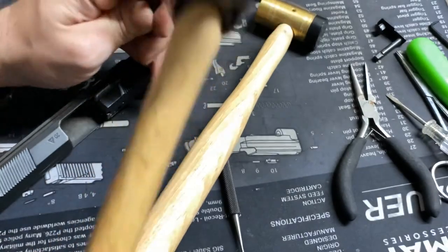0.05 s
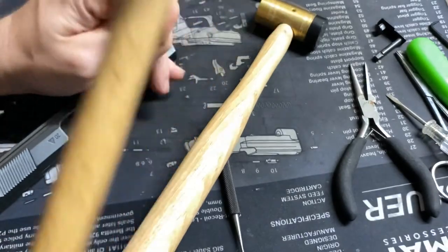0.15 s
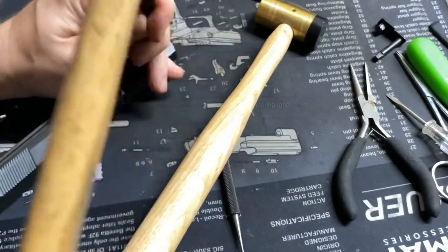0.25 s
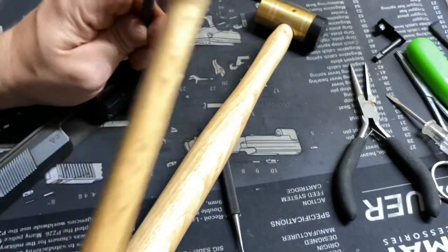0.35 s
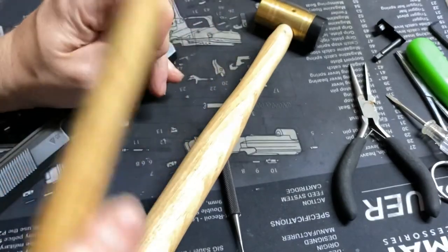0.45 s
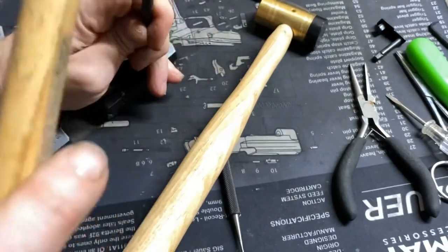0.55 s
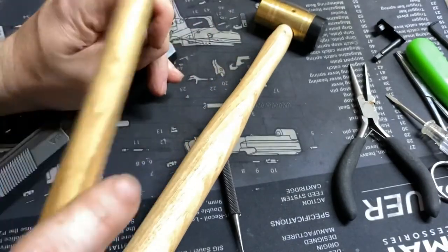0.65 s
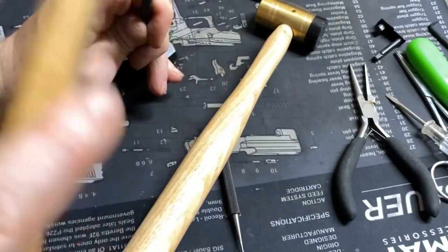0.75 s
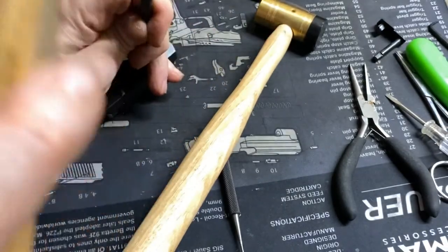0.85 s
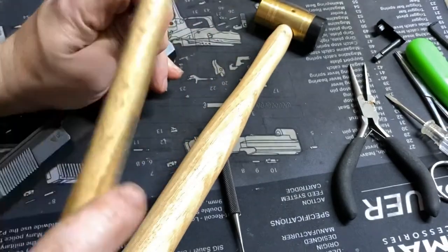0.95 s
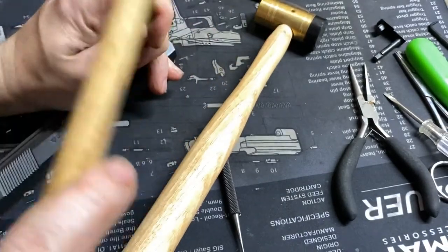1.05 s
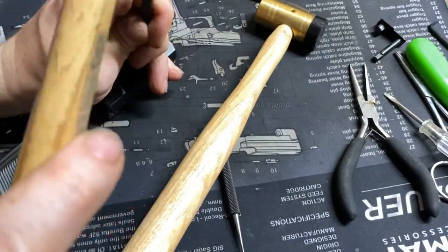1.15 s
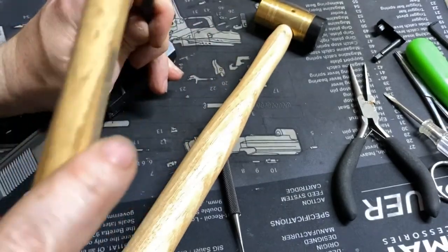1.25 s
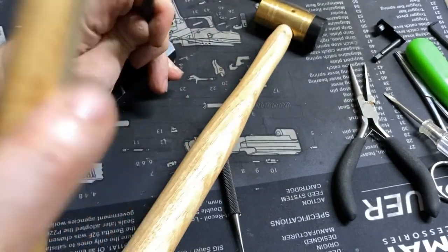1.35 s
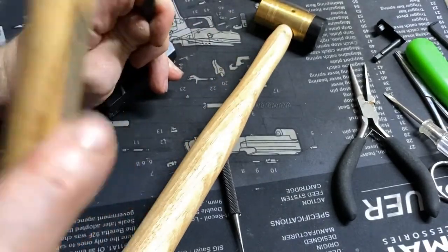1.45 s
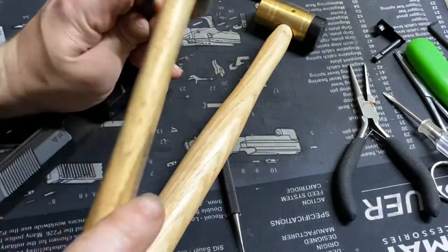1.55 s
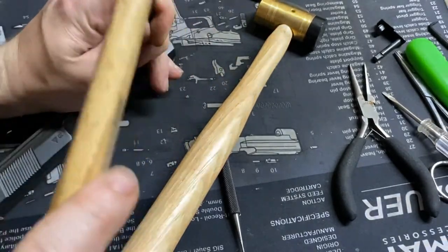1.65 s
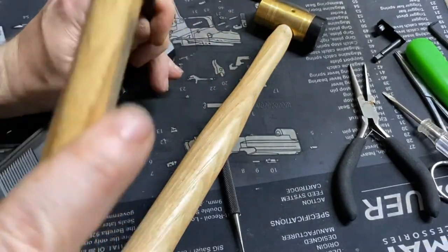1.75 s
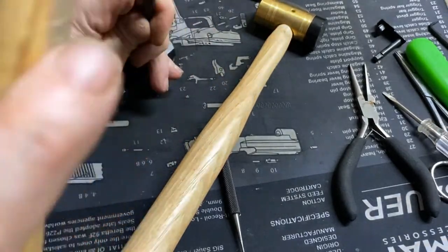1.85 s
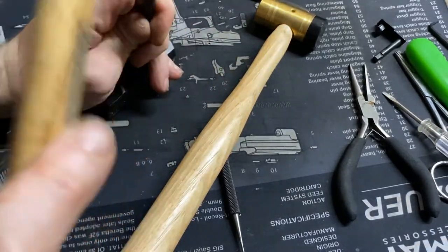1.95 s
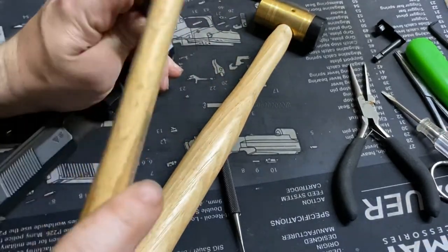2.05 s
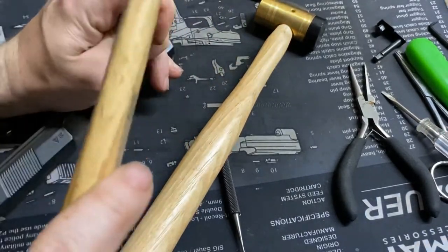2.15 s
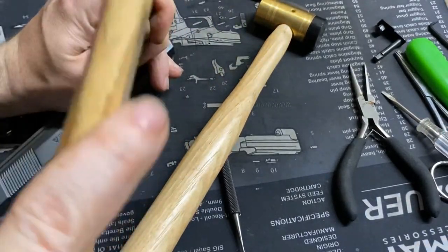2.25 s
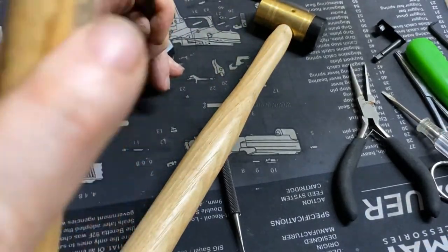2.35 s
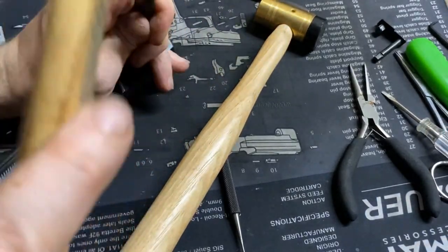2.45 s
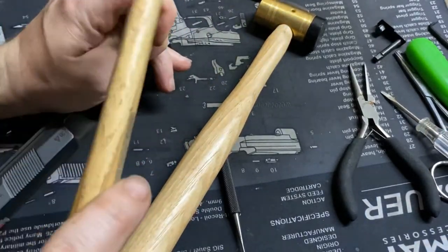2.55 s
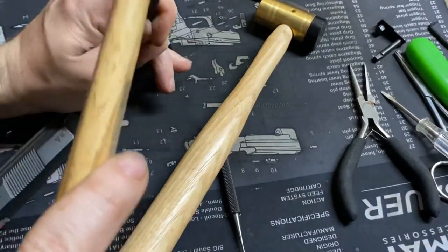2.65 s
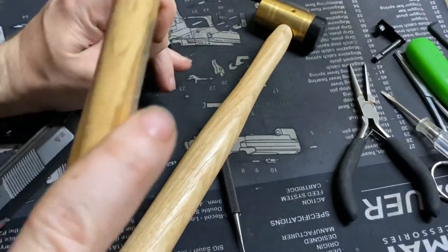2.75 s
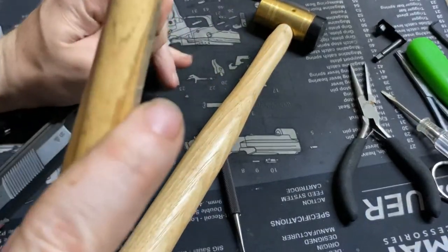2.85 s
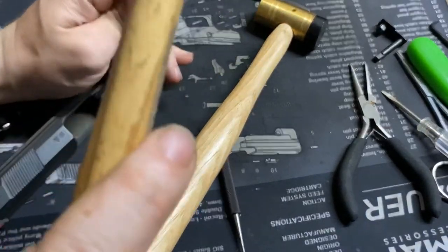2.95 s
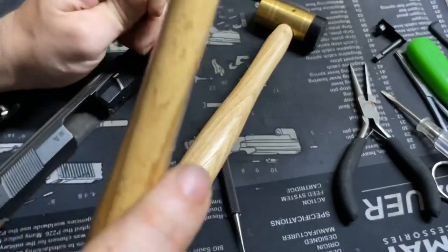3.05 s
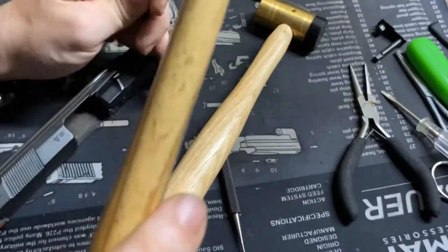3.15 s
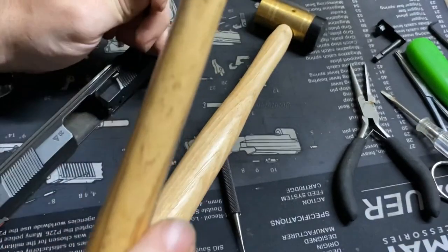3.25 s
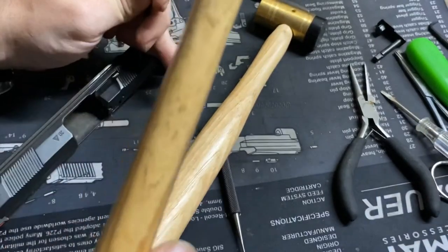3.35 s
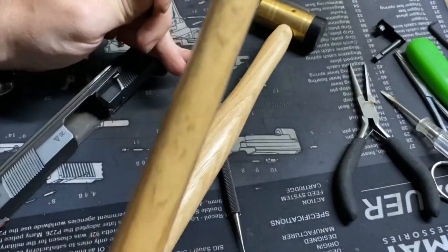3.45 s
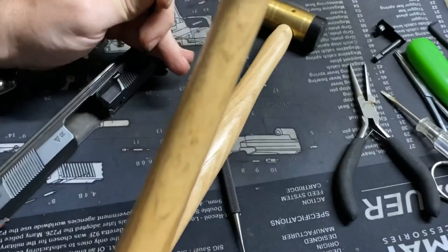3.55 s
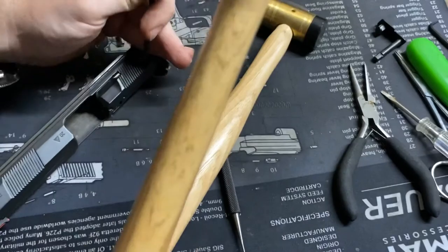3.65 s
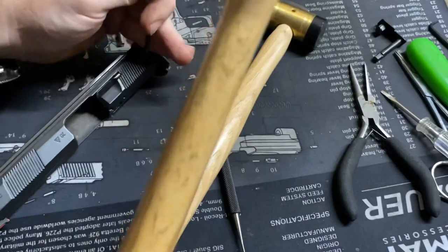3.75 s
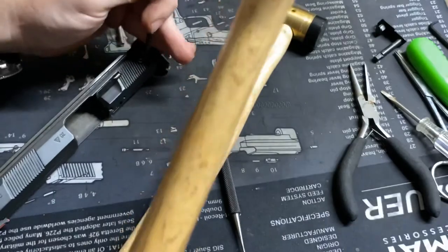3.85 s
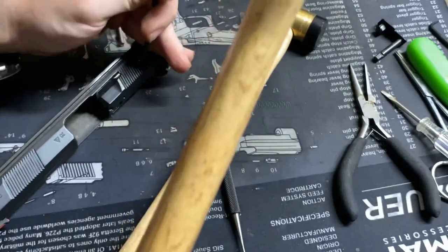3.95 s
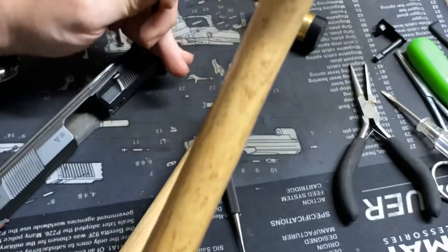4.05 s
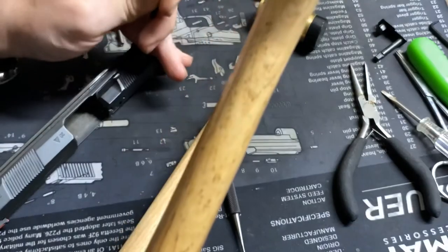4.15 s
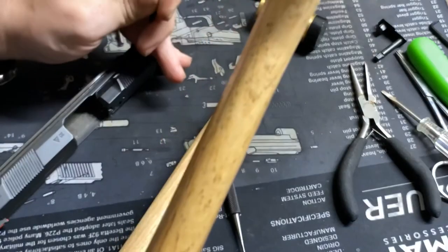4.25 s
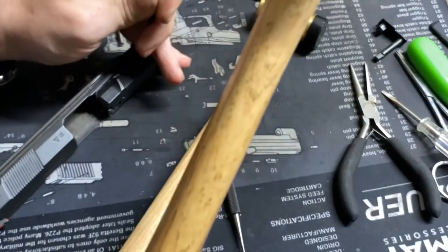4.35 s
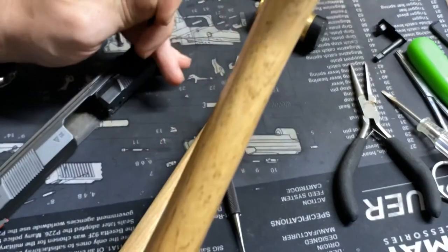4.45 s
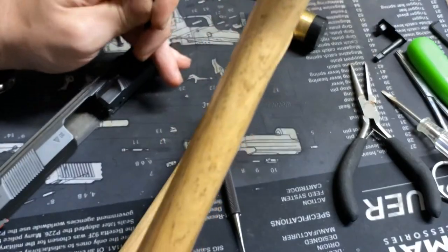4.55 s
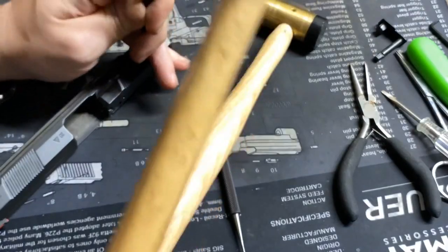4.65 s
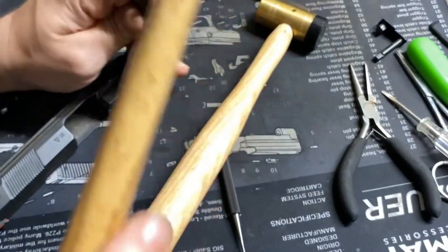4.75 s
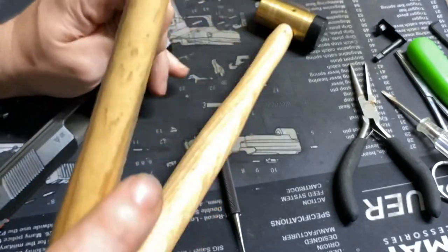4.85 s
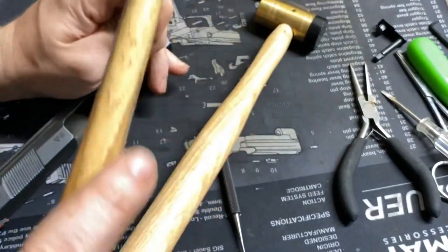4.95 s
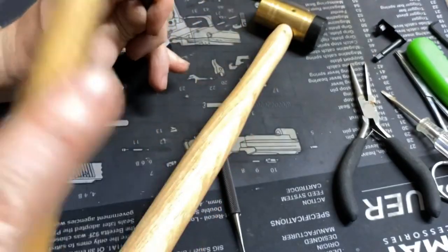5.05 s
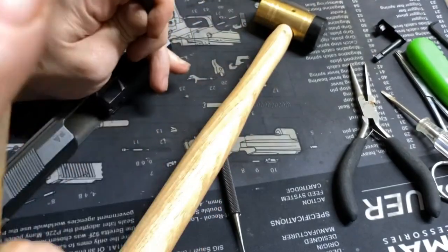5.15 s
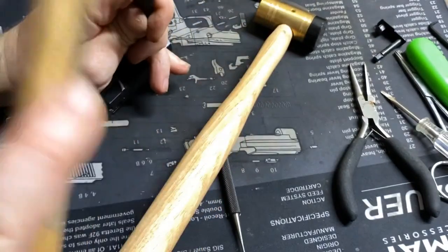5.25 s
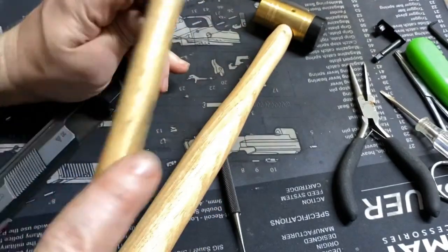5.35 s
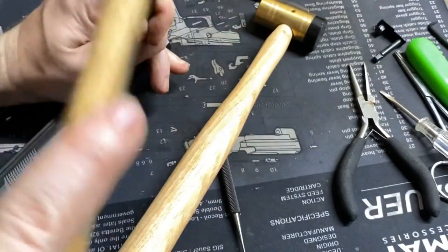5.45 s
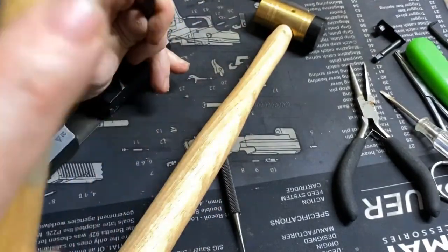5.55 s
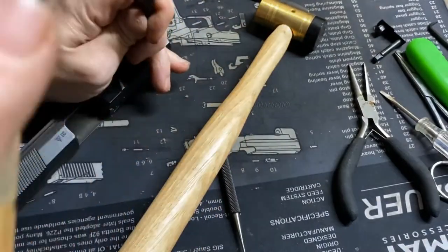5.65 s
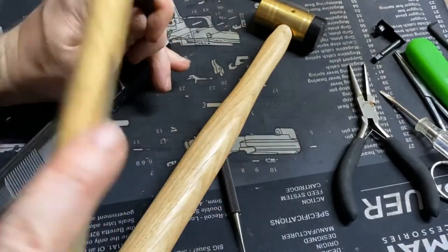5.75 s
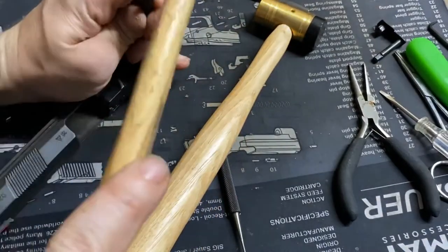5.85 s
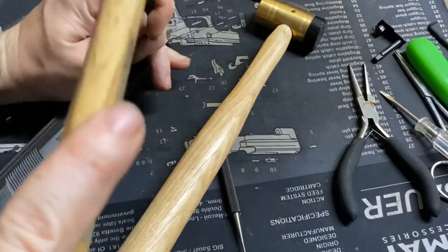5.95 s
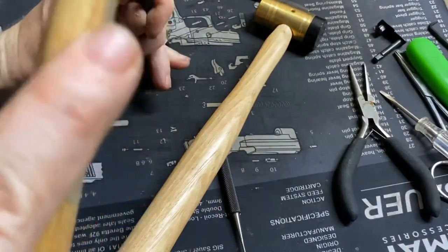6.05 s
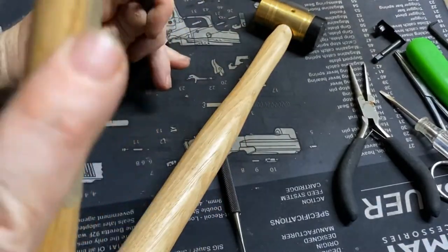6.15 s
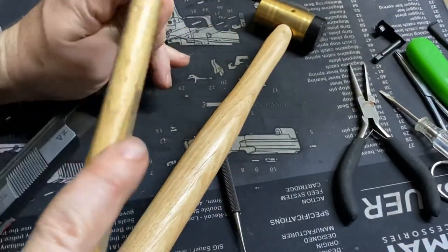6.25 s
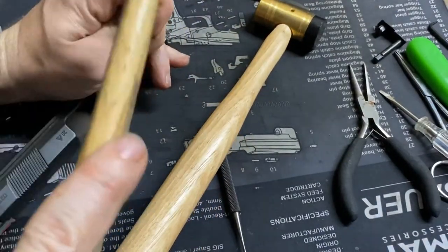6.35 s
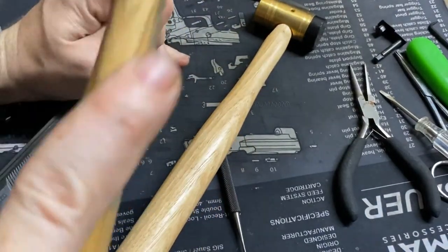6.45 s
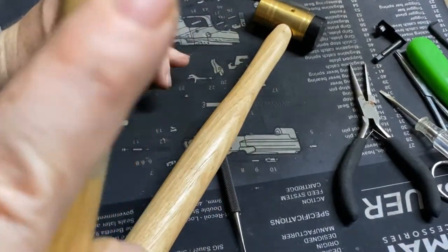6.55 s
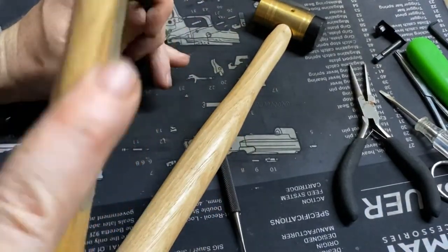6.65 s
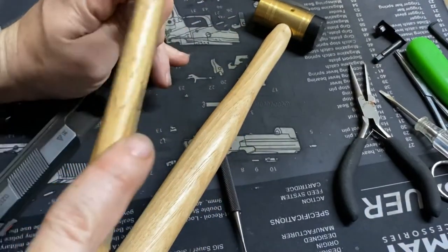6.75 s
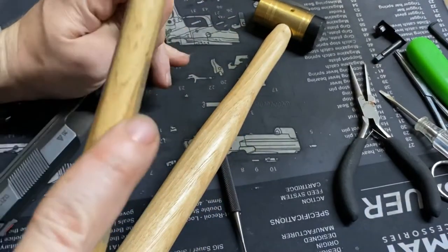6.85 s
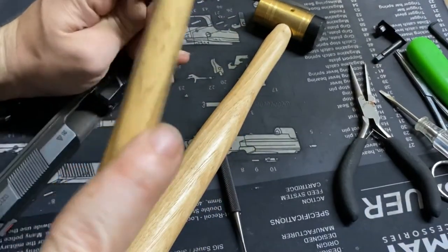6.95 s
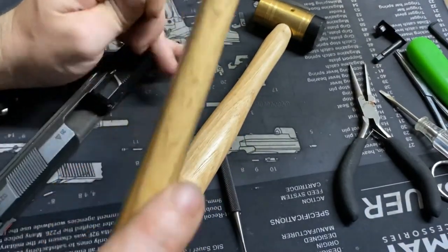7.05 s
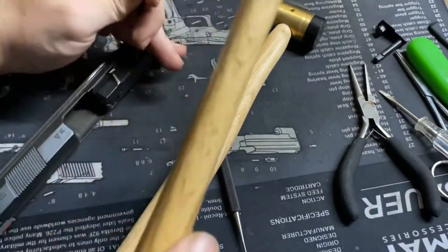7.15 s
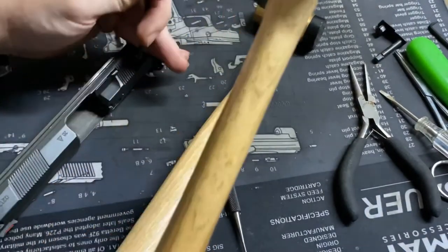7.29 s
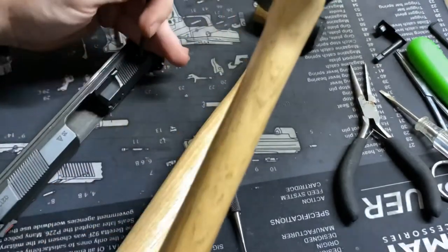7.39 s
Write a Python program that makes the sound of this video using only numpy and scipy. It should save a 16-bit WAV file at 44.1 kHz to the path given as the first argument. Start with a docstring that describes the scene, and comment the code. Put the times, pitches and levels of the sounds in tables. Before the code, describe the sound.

A small room carries a faint low rumble and a thin, wavering hum. In the first half second, fingers rub softly over metal with a few tiny ticks. At about 1.0 seconds a hammer strikes a steel punch, driving a pin into a pistol slide, and strikes again at 1.6, 2.0 and 2.6 seconds, the fourth slightly lighter. Each blow is close and loud: a bright metallic clink, a clack of the slide and a dull thud from the matted workbench, followed by a brief steel ring and short room echo. In the pause, parts shift with faint ticks around 3.1 and 3.5 seconds while the hum rises slightly. Four more blows land at 5.3, 5.8, 6.3 and 6.7 seconds, the last with the hardest clack and strongest ring. A light metal tick follows at about 7.1 seconds.

```python
"""A steel hammer taps a punch eight times, driving a pin into a pistol slide on a matted workbench.
Each blow makes the steel chatter and ring, the slide clack, the bench top thud and a small room ring.
A limiter holds the blows down. Before, between and after the two runs of four blows, the hands shift
the parts with faint ticks. Fingers rub the metal once at the start. A low rumble and a thin hum lie
under it all."""
import sys
import numpy as np
from scipy import signal
from scipy.io import wavfile
from scipy.ndimage import uniform_filter1d, minimum_filter1d

SR = 44100
rng = np.random.default_rng(int(sys.argv[2]) if len(sys.argv) > 2 else 0)


def unload_wav(signal):
    """Save mono or channel-first audio to the path in sys.argv[1] as 16-bit WAV at rate SR, clipped to [-1, 1]."""
    wavfile.write(
        sys.argv[1],
        SR,
        np.round(np.clip(np.atleast_2d(signal).T, -1, 1) * 32767).astype(np.int16),
    )


N = 327222
TIME = np.arange(N) / SR

# The hammer blows. Each row: start in seconds, then four relative levels in dB:
# force, clack of the slide, bright edge above 9 kHz, steel ring.
BLOWS = [(0.981, -.5, -4.5, 4.5, -3), (1.5551, 1, 2.5, -3.5, -2.5), (2.0492, 1, 1.5, -3, -2.5),
         (2.559, -2, -11.5, -4.5, -3), (5.3346, -1.2, 4, -.5, -2), (5.8136, 1, -1, -5.5, -3),
         (6.2732, 2, 4, -2.5, -5.5), (6.7408, 0.43, 15.5, 0.5, 5)]
# The hammer settles softly on the punch. Each row: start in seconds, force in dB, clack in dB.
SOFT_KNOCKS = [(1.194, -36.5, -30)]
# Lasting tones of slide and hammer. Each row: pitch in Hz, level in dB, seconds to fade by 60 dB (t60).
STEEL_TONES = [(2284, -49.5, 0.17), (2644, -48, 0.37), (4340, -54, 0.42), (6270, -52, 0.16),
               (6900, -47, .18), (7200, -47, 0.17), (7670, -49, 0.16), (10080, -48.5, 0.26),
               (10600, -50.5, 0.17), (11520, -52.5, .12), (15500, -46.5, .16)]
# How alike the room sounds left and right. Each row: frequency in Hz, likeness (1 means the same).
ROOM_LIKENESS = [(60, .93), (130, 0.59), (290, 0.43), (640, 0.017), (1400, 0.067), (3100, 0.87),
                 (7000, 0.11), (15000, .25)]
THUD_DB = 2.5  # added to a blow's force for the bench thud and the room ring below 4 kHz


def from_db(db):
    """Turn decibels into a gain to multiply by."""
    return 10 ** (np.asarray(db) / 20)


def rms_one(x):
    """Scale a signal so that its average level (rms) is 1."""
    return x / np.sqrt(np.mean(x ** 2) + 1e-20)


def at_hz(points, hz):
    """Read a value between the rows of a frequency table, spacing octaves evenly."""
    frequencies, values = np.transpose(points)
    return np.interp(np.log(hz), np.log(frequencies), values)


def butter(x, hz, kind, order=2):
    """A smooth filter that keeps the lows, the highs or one band."""
    sections = signal.butter(order, np.clip(hz, 10, .45 * SR), kind, fs=SR, output="sos")
    return signal.sosfilt(sections, x + 1e-18)


def resonate(x, hz, width):
    """Make a signal ring around one pitch; a narrower width in Hz rings longer."""
    r = np.exp(-np.pi * width / SR)
    feedback = [1, -2 * r * np.cos(2 * np.pi * hz / SR), r * r]
    return signal.lfilter(np.array([1, 0, -1]) * (1 - r * r) / 2, feedback, x + 1e-18)


def place(times, sounds):
    """Lay each sound on the time line at its own moment."""
    out = np.zeros(np.shape(sounds[0])[:-1] + (N + SR,))
    for s, sound in zip(times, sounds):
        start = max(round(s * SR), 0)
        out[..., start:start + sound.shape[-1]] += sound
    return out[..., :N]


def pan(x, left_db, lag_s=0):
    """Mono to stereo: the left is louder by left_db, and the right is later by lag_s."""
    delayed = np.interp(TIME - lag_s, TIME, x)
    return np.array([x * from_db(left_db / 2), delayed * from_db(-left_db / 2)])


def swell(start_s, end_s, db, rise_db_per_s, fall_db_per_s):
    """A gain that rises to a level, holds it from start to end, and falls away."""
    before, after = np.maximum(start_s - TIME, 0), np.maximum(TIME - end_s, 0)
    return from_db(db - rise_db_per_s * before - fall_db_per_s * after)


def noise_bands(spectrum, likeness, size):
    """Stereo noise as 24 pairs of centre in Hz and band, with a total power of about 1."""
    edges = np.geomspace(20, 17000, 25)
    centres = np.sqrt(edges[:-1] * edges[1:])
    gains = from_db(at_hz(spectrum, centres))
    gains = gains / np.sqrt(np.sum(gains ** 2 * np.diff(edges)) * 2 / SR)
    white = rng.standard_normal((2, 2, size))
    for k, hz in enumerate(centres):
        mid, side = butter(white[k % 2], edges[k:k + 2], "band")
        alike = np.clip(at_hz(likeness, hz), -1, 1)
        shared = np.sqrt((1 + alike) / 2) * mid
        opposed = np.sqrt((1 - alike) / 2) * side * [[1], [-1]]
        yield hz, gains[k] * (shared + opposed)


def struck(tones, scatter_db, spread, wide_hz=600):
    """Half a second of a struck object in stereo: fading tones, neighbours swinging opposite ways."""
    t = TIME[:SR // 2]
    hz, db, t60 = np.transpose(tones)[:, :, None]
    index = np.arange(len(hz))[:, None]
    # short waves depend more on the striking point, and reach left and right out of step
    shortness = np.minimum(hz / wide_hz, 1)
    strength = from_db(db + scatter_db * shortness ** 2 * rng.standard_normal(db.shape)) * (-1) ** index
    offset = spread * shortness * (-1) ** (index // 2)
    decay = strength * from_db(-60 * t / t60)
    phase = 2 * np.pi * hz * t
    return np.array([np.sum(decay * np.sin(phase + side * offset), axis=0) for side in (1, -1)])


def background(rumble_db=-54.5, hum_rest_db=-75.5):
    """The room rumbles low, and a thin, wavering hum comes and goes."""
    # Colour of the rumble. Each row: frequency in Hz, relative level in dB.
    rumble_colour = [(20, -8.5), (53, 4), (98, -23.5), (160, -17.5), (301, -16), (542, -23), (698, -25),
                     (1120, -33), (1700, -38), (2750, -62.5), (5000, -69.5), (16000, -66)]
    # How alike the rumble is left and right. Each row: frequency in Hz, likeness.
    rumble_likeness = [(50, .97), (200, 1), (600, 0.14), (3000, 0.16)]
    # Tones of the hum. Each row: pitch in Hz, width in Hz, relative level in dB.
    hum_tones = [(289, 13, -5.5), (470, 17, -8.5), (601, 7.3, -4), (625, 42, -5.5), (846, 74, -15),
                 (1200, 25, -19)]
    # Times when the hum grows. Each row: start in seconds, end in seconds, level in dB.
    hum_swells = [(0, .35, -65.5), (2.92, 4.78, -62.5), (5.684, 5.798, -61.5)]
    rumble = sum(band for hz, band in noise_bands(rumble_colour, rumble_likeness, size=N))
    noise = rng.standard_normal((2, N)) + rng.standard_normal(N)
    hum = sum(from_db(db) * rms_one(resonate(resonate(noise, hz, width), hz, width))
              for hz, width, db in hum_tones)
    swells = sum(swell(*row, rise_db_per_s=62, fall_db_per_s=38.5) for row in hum_swells)
    hum_gain = np.maximum(swells, from_db(hum_rest_db))
    return (from_db(rumble_db) * rumble + hum_gain * rms_one(hum)) * from_db([[.7], [-.7]])


def rub_stroke():
    """Pressure of the sliding fingers, as a gain: one stroke that swells, holds and dies away."""
    return swell(start_s=.11, end_s=0.29, db=-65.5, rise_db_per_s=106, fall_db_per_s=70.5)


def finger_rub(grain_db=2.5, ring_db=4, hiss_db=-3):
    """Skin rubs over metal with an uneven, dry hiss that makes the steel ring."""
    # Colour of the hiss. Each row: frequency in Hz, relative level in dB.
    hiss_colour = [(1200, 3.5), (2000, -7), (3500, -7.5), (7000, -13.5), (11000, -23), (16000, -34)]
    # Where the rubbed steel rings. Each row: pitch in Hz, width in Hz, relative level in dB.
    resonances = [(1917, 260, 2.5), (2605, 250, -4.5)]
    hiss = sum(band for hz, band in noise_bands(hiss_colour, ROOM_LIKENESS, size=SR))
    ring = sum(from_db(db + ring_db) * resonate(hiss, hz, width) for hz, width, db in resonances)
    grain = from_db(grain_db * rms_one(butter(rng.standard_normal(SR), 60, "low")))
    return place([0], [(from_db(hiss_db) * hiss + ring) * grain]) * rub_stroke()


def ticks(level_db=-1, contact_s=0.00099, after_db=-26, after_t60=0.19, ring_db=19,
          damping_db_per_s=170, soft_hz=7000, catches_per_s=25, catch_db=4):
    """Steel parts touch as the grip changes and catch under the fingers; the held slide rings briefly."""
    # Light touches. Each row: start in seconds, strength in dB, ring relative to the touch in dB.
    grip_touches = [(0.1203, -52, -1), (0.1986, -54, 6), (0.3023, -58, 3), (3.1444, -43, -1.5),
                    (3.4814, -46, -10), (3.5402, -48.5, -12), (7.1197, -42, -4.5), (7.1827, -61, -12)]
    # Colour of a touch, from the punch tip on the pin and from the slide. Each row: pitch in Hz, width in Hz,
    # relative level in dB.
    resonances = [(2622, 71.4, -10), (4700, 500, -11), (4800, 390, 6), (6750, 1700, -13),
                  (9300, 1100, -4.5)]
    t = TIME[:SR // 8]
    force = np.exp(-t / contact_s) + from_db(after_db - 60 * t / after_t60)
    stroke = rub_stroke()
    moments = np.flatnonzero(rng.random(SR) < catches_per_s / SR)
    catches = [(i / SR, 20 * np.log10(stroke[i]) + catch_db, 0) for i in moments]
    times, touch_db, loose_db = np.transpose(grip_touches + catches)
    bursts = [from_db(db + level_db) * force * rng.standard_normal(len(t)) for db in touch_db]
    touches = place(times, bursts)
    clicks = sum(from_db(db) * resonate(touches, hz, width) for hz, width, db in resonances)
    hand_damping = from_db(ring_db - damping_db_per_s * TIME[:SR // 2])
    rings = [from_db(db) * hand_damping * struck(STEEL_TONES, scatter_db=5.5, spread=0.55)
             for db in touch_db + loose_db]
    return pan(clicks, left_db=6.5) + butter(place(times, rings), soft_hz, "low")


def chatter_db(bright, average_db=-1.4, growth=1.8):
    """Each blow's chatter grows faster than its force; the bright edge depends on a square hit."""
    _, force_db, _, edge_db, _ = np.transpose(BLOWS)
    return edge_db if bright else average_db + growth * force_db


def room_ring(level_db=-23.0, build_s=.005, treble_follow=0.36, left_db=1.5, change=0.59):
    """The room rings after every blow; its fine pattern shifts with the striking point."""
    # Colour of the ring. Each row: frequency in Hz, relative level in dB.
    colour = [(50, -4.5), (130, -8), (300, 6.5), (600, 0), (1000, -5.5), (1500, -6), (2300, -14),
              (3500, -20), (5500, -24.5), (7200, -22), (8500, -28), (11000, -25.5), (15500, -30)]
    # The treble dies a little sooner. Each row: frequency in Hz, seconds to fade by 60 dB.
    fade_times = [(100, .35), (400, 0.32), (1500, 0.36), (4000, 0.32), (8000, .31), (15000, .29)]
    t = TIME[:SR * 3 // 4]
    times, force_db, *_ = np.transpose(BLOWS)
    tails = np.zeros((len(times), 2, len(t)))
    for hz, band in noise_bands(colour, ROOM_LIKENESS, size=2 * len(t)):
        drive_db = THUD_DB + force_db if hz < 4000 else treble_follow * chatter_db(bright=hz > 9000)
        # each blow gets its own blend of two stretches of noise
        blend = change * rng.standard_normal((len(times), 1, 1))
        pattern = np.cos(blend) * band[:, :len(t)] + np.sin(blend) * band[:, len(t):]
        envelope = from_db(-60 * t / at_hz(fade_times, hz)) * (1 - np.exp(-t / build_s))
        tails += from_db(level_db + drive_db)[:, None, None] * pattern * envelope
    return place(times, tails) * from_db([[left_db / 2], [-left_db / 2]])


def bench_thud(delay_s=.0015, left_db=3.0, press_s=0.04, lift_s=0.00049, free_db=-3.5):
    """The slide is driven into the mat and the bench thuds; as the pressure lifts, it rings less."""
    # The bench top with the slide on it. Each row: pitch in Hz, level in dB, seconds to fade by 60 dB.
    bench_tones = [(55.6, -30, 0.16), (80.55, -26.5, 0.27), (111.4, -20, 0.21), (137.7, -18, 0.15),
                   (187.4, -27, 0.16), (260.6, -12, .078), (304.4, -12.5, 0.085), (311, -37, .25),
                   (372, -5.5, 0.022), (423, -8.5, 0.032), (459.2, -24, 0.23), (566, -23.5, 0.1),
                   (621, -32.5, 0.25), (664, -27.5, 0.16), (891, -31.5, 0.13), (959.4, -35, 0.31),
                   (1167, -22.5, .022), (1157, -29.5, 0.18), (1430, -20.5, 0.014), (1396, -35, 0.22),
                   (1503, -37.5, 0.32), (1720, -37.5, 0.16)]
    t = TIME[:SR // 2]
    hits = [row[:2] for row in BLOWS + SOFT_KNOCKS]
    lifted = (1 + np.tanh((t + delay_s - press_s) / lift_s)) / 2
    contact = from_db(free_db * lifted)
    thuds = [from_db(THUD_DB + db) * contact * struck(bench_tones, scatter_db=0.73, spread=0.25)
             for s, db in hits]
    return place([s + delay_s for s, db in hits], thuds) * from_db([[left_db / 2], [-left_db / 2]])


def slide_clack(hard_hz=1130, hard_db=-19, woody_hz=640, woody_db=-20.0, width_hz=520,
                t60=0.011, delay_s=.0008, rebound_s=.013, rebound_db=-10):
    """The slide knocks against its support, and once more as it drops back onto the mat."""
    t = TIME[:SR // 10]
    hits = BLOWS + SOFT_KNOCKS
    since_rebound = np.maximum(t - rebound_s, 0)
    rebound = (since_rebound > 0) * from_db(rebound_db - 60 * since_rebound / t60)
    force = from_db(-60 * t / t60) + rebound
    strength = np.sqrt(np.mean(force ** 2))

    def rattle(hz):
        """A burst of noise around one pitch that follows the force."""
        noise = rng.standard_normal(len(t))
        return rms_one(force * resonate(resonate(noise, hz, width_hz), hz, width_hz))

    clacks = []
    for _, force_db, clack_db, *_ in hits:
        hard = from_db(clack_db + hard_db) * rattle(hard_hz)  # depends on the aim
        woody = from_db(force_db + woody_db) * rattle(woody_hz)  # depends on the weight of the blow
        clacks.append(strength * (hard + woody))
    return pan(place([row[0] + delay_s for row in hits], clacks), left_db=5.0, lag_s=.00008)


def steel_ring(level_db=-0.5):
    """Thin tones linger in the steel after a blow, more when the grip is loose."""
    rings = [from_db(ring_db + level_db) * struck(STEEL_TONES, scatter_db=4.0, spread=0.26)
             for *_, ring_db in BLOWS]
    return place([row[0] for row in BLOWS], rings)


def punch_chatter(contact_s=0.0019, rise_s=0.00024, level_db=-2.0, after_db=-19, after_t60=0.12,
                  edge_hz=9000, scatter=0.58):
    """Hammer, punch and pin chatter for two milliseconds, then buzz away; a square hit is brighter."""
    # Punch and hammer head, damped by the hands. Each row: pitch in Hz, width in Hz, level in dB.
    resonances = [(1920, 250, -8.5), (2780, 410, -14.5), (4570, 450, -11.5), (7220, 280, -1.5),
                  (9644, 260, -0.5), (11120, 170, 4), (13170, 400, -3), (14640, 790, 3)]
    t = TIME[:SR // 10]
    times = [row[0] for row in BLOWS]
    force = np.exp(-(t / contact_s) ** 4) + from_db(after_db - 60 * t / after_t60)
    force = force * (1 - np.exp(-t / rise_s))

    def bursts(hz, width, gains):
        """Fresh noise shakes one resonance at every blow."""
        shakes = [rms_one(resonate(force * rng.standard_normal(len(t)), hz, width)) for _ in times]
        return place(times, [gain * shake for gain, shake in zip(gains, shakes)])

    out = 0
    for hz, width, db in resonances:
        bright = hz > edge_hz
        strength = np.sqrt(np.mean(force ** 2) * np.pi * width / SR)
        gains = strength * from_db(level_db + db + chatter_db(bright))
        direct, scattered = bursts(hz, width, gains), bursts(hz, width, gains)
        # the highest tones reach left and right out of step, partly scattered by the hands
        if bright:
            wide = pan(direct, left_db=-2.0, lag_s=-0.000094) + scatter * scattered * [[1], [-1]]
            out = out + wide / np.hypot(1, scatter)
        else:
            out = out + pan(direct, left_db=5)
    return out


def scene(blow_db=8):
    """Loud blows over quiet handling and room noise."""
    blows = bench_thud() + slide_clack() + punch_chatter() + steel_ring() + room_ring()
    return from_db(blow_db) * blows + ticks() + finger_rub() + background()


def limiter(x, ceiling_db=-9.0, hold_s=0.11, release_db_per_s=90, ahead_s=0.0029):
    """The volume drops just ahead of a loud sound, stays down, then climbs back."""
    power = uniform_filter1d(np.mean(x ** 2, axis=0), size=44)
    over_db = np.maximum(10 * np.log10(np.abs(power) + 1e-12) - ceiling_db, 0)
    hold, ahead = int(hold_s * SR), int(ahead_s * SR)
    held_db = -minimum_filter1d(-over_db, hold, origin=(hold - 1) // 2)  # largest recent excess
    release_db = release_db_per_s * TIME
    cut_db = np.maximum.accumulate(held_db + release_db) - release_db
    early_cut_db = np.pad(cut_db[ahead:], (0, ahead))
    return x * from_db(-uniform_filter1d(early_cut_db, size=88))


def record(dry, peak=0.44, cutoff_hz=16200):
    """Hold the blows down, round off their peaks and steeply cut the highest treble."""
    limited = limiter(dry)
    rounded = limited / (1 + (limited / peak) ** 4) ** (1 / 4)
    treble_cut = signal.ellip(10, .2, 80, cutoff_hz, fs=SR, output="sos")
    return signal.sosfilt(treble_cut, rounded)


dry = scene()
out = record(dry)
unload_wav(out)
```